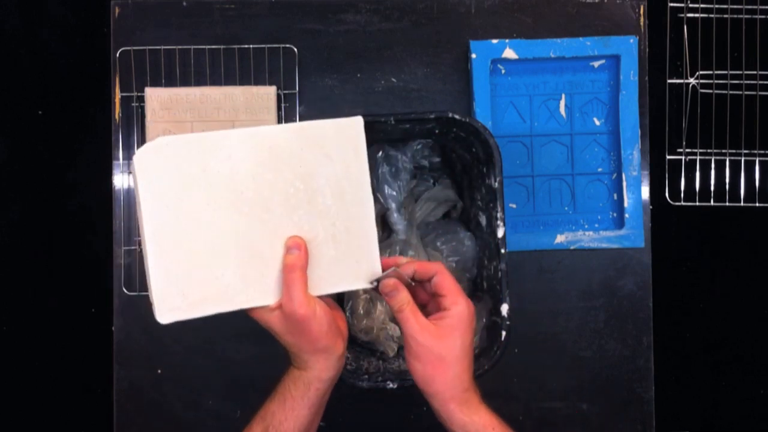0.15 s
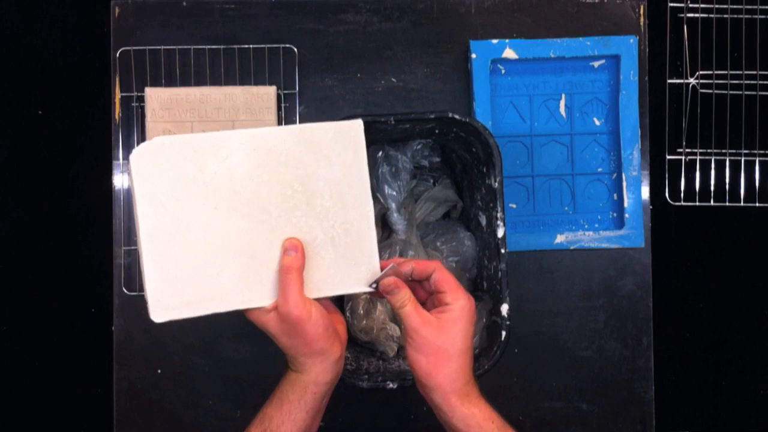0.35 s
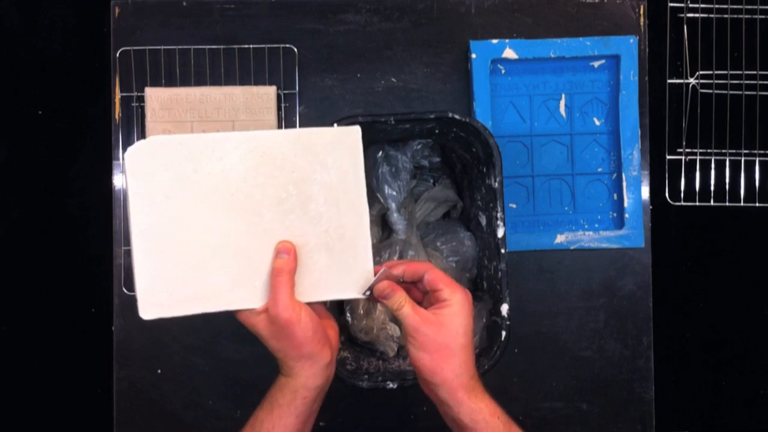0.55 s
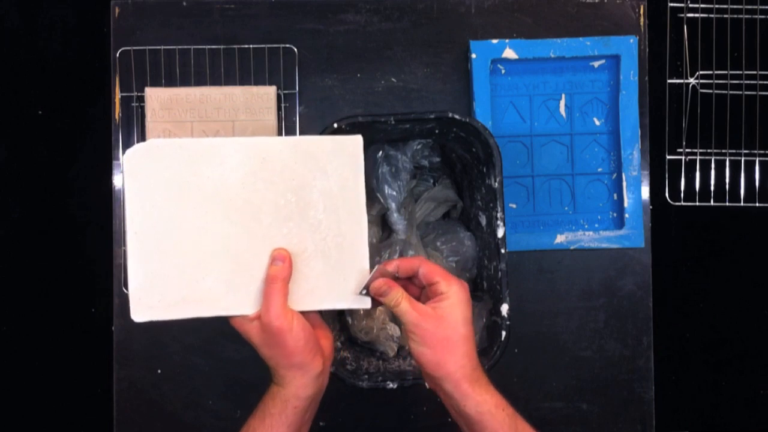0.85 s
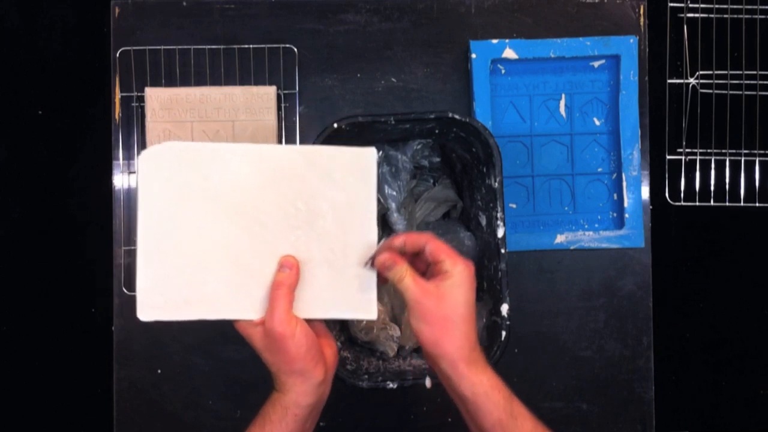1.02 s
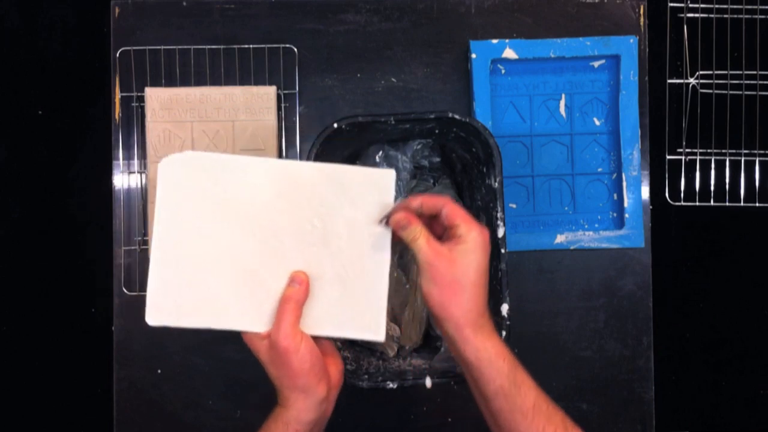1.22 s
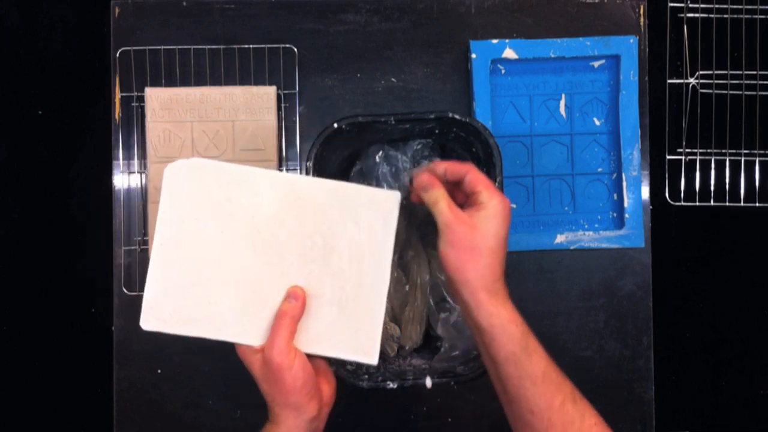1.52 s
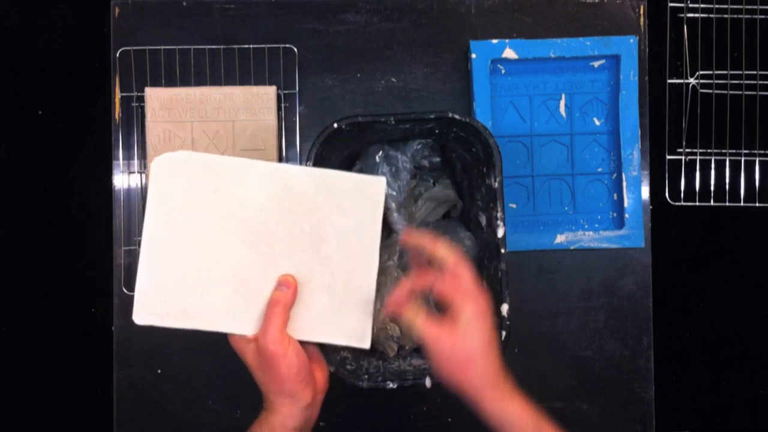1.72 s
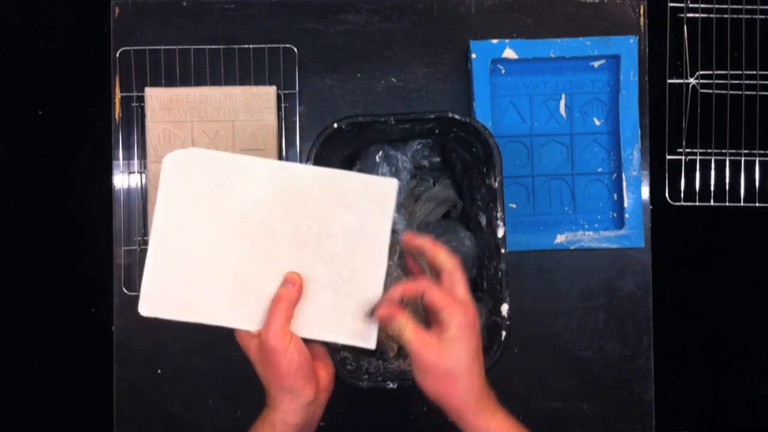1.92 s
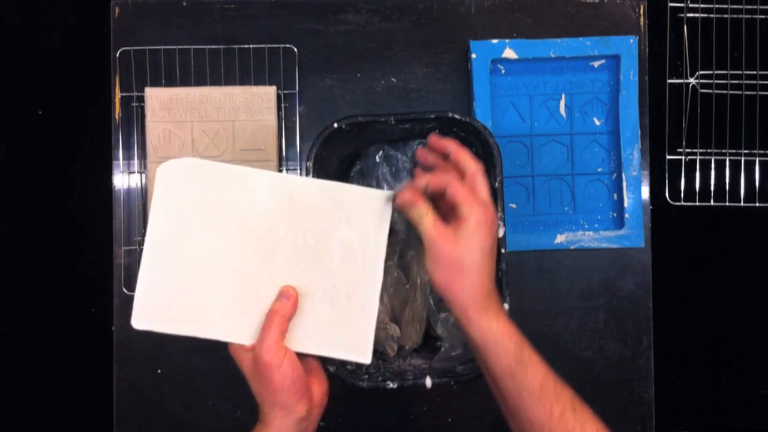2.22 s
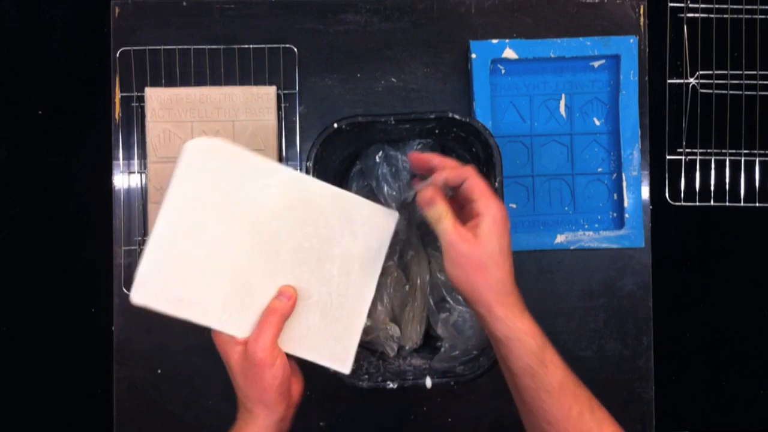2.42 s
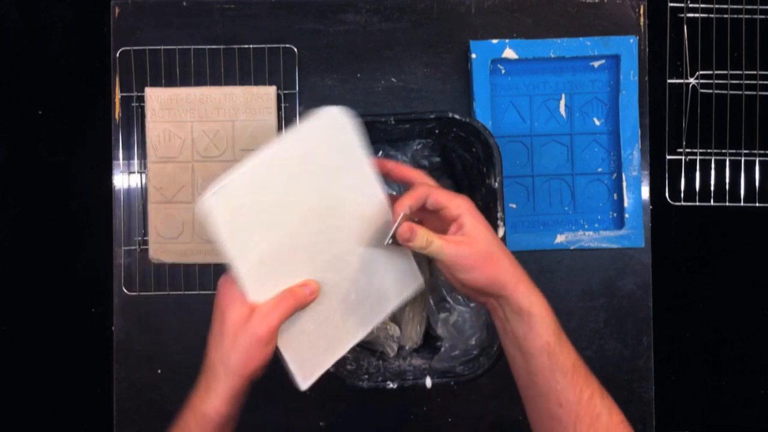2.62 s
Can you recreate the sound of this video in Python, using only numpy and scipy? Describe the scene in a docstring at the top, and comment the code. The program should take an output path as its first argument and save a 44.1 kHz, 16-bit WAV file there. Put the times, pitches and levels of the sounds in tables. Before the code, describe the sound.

Gritty scraping of thin metal along a hard plaster slab's edge, with knocks and ticks, in a quiet room

```python
"""First a soft hiss and low rumble of a quiet workshop, then light touches on a hand-held plaster slab.
A small aluminium blade scrapes its edge: a few light strokes, then two long ones. Random crumbling grains
hiss and set slab and blade ringing, which are banks of resonances. Noise bursts make the knocks, as the
blade lands or slips off the corner, and the ticks of crumbs. Filtered noise makes rubbing, hum and rumble.
The work and the room are on the left; the right holds only hiss and a faint trace of the left."""
import sys
import numpy as np
from scipy import signal
from scipy.fft import rfft, irfft
from scipy.io import wavfile

SR = 44100
rng = np.random.default_rng(int(sys.argv[2]) if len(sys.argv) > 2 else 0)


def store_wav(level_fs):
    """Save 16-bit WAV to argv[1]."""
    pcm = np.round(np.clip(np.atleast_2d(level_fs), -1, 1) * 32767)
    wavfile.write(sys.argv[1], SR, pcm.T.astype(np.int16))


N = 121275
TIME = np.arange(N) / SR

# How hard each stroke presses and bites; the overall levels below are added to these.
# Columns: t/s, slab ring level/dB, blade ring level/dB, grit hiss level/dB
FIRST_BRUSH = [(0.058, -89, -80, -85), (0.064, -57, -66, -82), (0.10, -72, -82, -86),
               (0.13, -53.5, -64, -80), (0.155, -90, -80, -85)]
SHORT_STROKE = [(0.82, -68, -82, -85), (0.85, -64, -78, -84), (0.884, -57.5, -77, -76),
                (0.896, -32, -53, -43), (0.916, -42, -74, -59), (0.928, -38.5, -60, -49.5),
                (0.948, -52, -73, -74), (0.968, -55, -79, -80), (0.995, -70, -83, -82)]
SECOND_BRUSH = [(1.055, -69, -80, -85), (1.065, -61, -79, -83), (1.09, -61.5, -82, -82),
                (1.112, -63, -78, -84)]
FIRST_PASS = [(1.112, -61, -77, -70), (1.132, -36, -48.5, -46.5), (1.16, -40, -49, -45),
              (1.24, -37, -48, -48), (1.244, -41.5, -58, -53), (1.288, -33, -44.5, -42),
              (1.362, -39, -52.5, -52.5), (1.402, -31, -33, -41), (1.446, -34, -48.5, -44.5),
              (1.502, -42, -44, -48.5), (1.598, -40.5, -43.5, -47), (1.626, -31.5, -35, -41.5),
              (1.652, -35.5, -47, -49.5), (1.67, -31, -42, -39), (1.7, -50, -71, -73)]
SECOND_PASS = [(2.078, -53, -76, -58), (2.096, -40, -39.5, -45.5), (2.16, -37, -42.5, -45),
               (2.182, -37, -38.5, -38), (2.204, -41, -48, -43), (2.23, -33, -45, -38.5),
               (2.326, -33, -58, -36.5), (2.348, -34.5, -51, -40.5), (2.424, -34, -46, -40),
               (2.474, -34, -42, -42), (2.48, -25.5, -35, -40.5), (2.492, -31.5, -39, -40),
               (2.51, -48, -85, -79)]
# The strokes in order. Columns: stroke table, start place on the edge (0-1), end place (0-1),
# coarse grating level/dB, crunch level/dB against the hiss, blade f/Hz, blade resonance width f/Hz
STROKES = [(FIRST_BRUSH, 0, 0, -24, 2, 6900, 570), (SHORT_STROKE, 0.012, 0.23, -7, -12, 6300, 1000),
           (SECOND_BRUSH, 0.017, 0.027, -10, -8, 7000, 1000), (FIRST_PASS, 0.036, 1, -3.6, -15, 7330, 690),
           (SECOND_PASS, 0.25, 0.98, -2.9, -14, 7140, 1340)]
RING_DB, BLADE_DB, HISS_DB = 3.5, 5.5, 8   # overall levels
SPEED_UP = 1.09   # the hand gathers speed: distance grows with this power of time

GRAINS_PER_S, GRAIN_SPREAD_DB = 14000, 1.5
CHATTER_PER_S, CHATTER_DB = 124, 2   # the edge catches and slips
CHIPS_PER_S, CHIP_SIZE, CHIP_S = 80, 0.8, 0.0005   # larger crumbs: rate, average jump in bite, fade time
CRUNCH_HZ, CRUNCH_WIDTH_HZ = 5530, 1500

# Ways the slab can ring (modes); their levels count only against each other.
# Columns: f/Hz, width f/Hz, mid-edge level/dB, extra near-corner level/dB, extra far-corner level/dB
SLAB_MODES = [(699.6, 4.24, -13, 11.5, 6.5), (796, 27.5, -14.5, -18, -3.5), (1469, 29.8, -9, 14.5, 14),
              (1592, 37, -18.5, 5, 15), (1955.5, 22.6, 2, -4.5, -7), (2213, 58, -5, 4, 6),
              (2318, 210, -16, 5.5, -16), (2967, 40, -14, 9, 4), (3205, 54, -8.5, -32, 6.5),
              (3260, 90, -16.5, -8, 1), (3714, 59, -15.5, 12.5, 16.5), (4007, 95, -22, 19.5, 11.5),
              (4410, 30, -16, 21.5, 20), (4704, 43, -18.5, -15, 14)]
CORNER_SHARPNESS = 7.4   # how fast a corner's colour fades along the edge
MODE_WANDER_PER_S, MODE_WANDER_DB = 2.1, 2.5   # each mode waxes and wanes as the contact travels

# The blade lands or slips off the corner; clack and ring levels scale the bursts before filtering.
# Columns: t/s, clack level/dB, crumbling fade t/s, ring level/dB, place on the edge (0-1)
KNOCKS = [(0.409, -33, 0.0073, -39.5, 0), (0.895, -58, 0.002, -20, 0.5), (1.669, -37, 0.0083, -31, 0.76),
          (2.047, -38.5, 0.012, -50, 0.1), (2.0551, -17, .002, -10.5, 0.11), (2.058, -11, 0.0022, -15, 0.7),
          (2.477, -36, 0.0019, -40, 0.8), (2.488, -46, 0.0035, -22, 0.7)]
KNOCK_SNAP = 0.88   # first contact, against the crumbling after it
KNOCK_SOFT_HZ = 2150   # a knock rings mostly the modes below this

# Hand and tool rub dully on the slab. Columns: start t/s, end t/s, level/dB
RUBS = [(0.034, 0.14, -59), (0.87, 0.98, -53.5), (1.107, 1.64, -45.5), (1.638, 1.828, -57),
        (2.065, 2.596, -49)]
RUB_FADE_S = 0.022
# Crumbs and light touches. Columns: t/s, level/dB of the touch, f/Hz, width f/Hz
TICKS = [(0.062, -45, 2500, 4440), (0.249, -46, 1640, 1500), (0.262, -41, 8800, 4000),
         (0.411, -37.5, 5900, 3000), (0.426, -44, 8000, 5000), (1.776, -40, 7160, 2000),
         (1.8001, -38.5, 1670, 2200), (1.835, -42.5, 1380, 1200), (1.891, -41, 2050, 780),
         (1.955, -42, 4900, 2000), (2.039, -42, 7550, 4000), (2.611, -39.5, 11500, 7000),
         (2.663, -43, 1870, 1200), (2.731, -41.5, 2450, 5070)]
TICK_S, TICK_SNAP = 0.0014, 2.5   # fade time of the crumble, size of the snap against it

# Tone of each sound: only the shape counts, as the filter evens out the total power.
# Columns: f/Hz, level/dB (per Hz)
GRATING_TONE = [(500, -26), (1050, -22.5), (1450, -7.5), (1750, -1), (2300, -1), (2750, -2), (3150, 7),
                (3500, -15.5), (4300, -4.5), (5200, -15), (9000, -11.5)]
GRIT_TONE = [(1500, -25), (4000, -27), (5000, -24), (5900, -3), (7000, 11.5), (8700, 8), (10200, 1.5),
             (11300, 9.5), (12500, 10.5), (14000, 7), (15800, 4)]
KNOCK_TONE = [(50, -50), (150, -39), (400, -25), (750, -4), (1020, -22), (1430, 5), (1700, -12),
              (2050, 3.5), (2500, -4), (3200, -8), (4100, -13), (5500, -30), (7000, -23), (8500, -31),
              (15000, -38)]
RUBBING_TONE = [(50, -17), (120, -2), (300, 0), (750, 2), (1100, -13.5), (2500, 0.5), (8000, -32.5)]
RUMBLE_TONE = [(20, -24), (45, -11), (70, -14.5), (92, 2), (125, -8), (165, -5), (260, -4), (500, -8),
               (1000, -12.5), (2000, -18.5), (6000, -38), (16000, -32)]
# Tone of the reflections, again only its shape. Columns: f/Hz, level/dB
ROOM_TONE = [(100, -0.5), (1000, 5.5), (4500, -0.5), (7000, 0), (15000, -1)]

ROOM_T60_S, ROOM_DB = 0.32, -16   # T60: time to fade by 60 dB
BENCH_T60_S, BENCH_DB = 0.093, -13.5   # close reflections off the bench and tub
REFLECTION_DELAY_S = 0.0088
# A low hum in the room swells and fades. Columns: t/s, level/dB
HUM_LEVEL = [(0, -66), (1.0, -84), (1.8, -64), (2.15, -66), (2.35, -61), (2.62, -59), (2.75, -78)]
HUM_HZ, HUM_WIDTH_HZ = 114.5, 12.3
RUMBLE_DB, LEFT_HISS_DB, RIGHT_HISS_DB = -58.5, -56, -59
RIGHT_LEAK_DB = -73
CUTOFF_HZ = 15800


def scraping():
    """Grains drive the slab, the blade and the hiss through each stroke, all chattering together."""
    chatter = chattering()
    grating = colour(grains(chatter), GRATING_TONE)
    hiss = colour(grains(chatter), GRIT_TONE)
    crunch = narrow(grains(chatter), CRUNCH_HZ, CRUNCH_WIDTH_HZ)
    blade_grains = grains(chatter)
    out, force, place = 0, 0, 0
    for curve, start, end, grate_db, crunch_db, blade_hz, blade_width in STROKES:
        s, *levels = np.transpose(curve)
        touching = (TIME >= s[0]) & (TIME < s[-1])
        push, bite, dust = [touching * from_db(np.interp(TIME, s, db)) for db in levels]
        travelled = np.interp(TIME, [s[0], s[-1]], [0, 1]) ** SPEED_UP
        place = np.where(touching, start + (end - start) * travelled, place)
        force = force + push
        blade = narrow(blade_grains, blade_hz, blade_width)
        grit = hiss + from_db(crunch_db) * crunch
        out = out + from_db(BLADE_DB) * bite * blade
        out = out + from_db(HISS_DB) * dust * grit
        out = out + from_db(grate_db) * push * grating
    return out + from_db(RING_DB) * slab(force * grains(chatter), place)


def chattering():
    """Uneven bite of the edge, with a brief jump each time a chip breaks away."""
    chips = (rng.random(N) < CHIPS_PER_S / SR) * np.minimum(rng.exponential(1, N), 2)
    fade = np.exp(-1 / (CHIP_S * SR))
    jumps = signal.lfilter([1], [1, -fade], chips + 1e-18)
    return from_db(CHATTER_DB * drift(CHATTER_PER_S)) * (1 + CHIP_SIZE * jumps)


def grains(chatter):
    """Dense fractures at random moments, uneven in size, whose strength follows the edge's chatter."""
    sizes = from_db(GRAIN_SPREAD_DB * np.minimum(rng.exponential(1, N), 5))
    signs = rng.choice([-1, 1], N)
    breaking = rng.random(N) < GRAINS_PER_S / SR
    return rms_one(sizes * signs * breaking * chatter)


def slab(force, place):
    """The slab's modes under a force; where the edge is touched decides which of them speak."""
    place = np.clip(place, 0, 1)
    near, far = (1 - place) ** CORNER_SHARPNESS, place ** CORNER_SHARPNESS
    gains = [from_db(db + near_db * near + far_db * far) for _, _, db, near_db, far_db in SLAB_MODES]
    # even out the total ringing power along the edge
    power = sum(gain ** 2 * np.pi * mode[1] / SR for gain, mode in zip(gains, SLAB_MODES))
    force = force / np.sqrt(power)
    out = 0
    for k, (gain, (hz, width, *_)) in enumerate(zip(gains, SLAB_MODES)):
        wander = from_db(MODE_WANDER_DB * drift(MODE_WANDER_PER_S))
        # neighbouring modes take opposite signs
        out = out + resonate(force * gain * wander, hz, width) * (-1) ** k
    return out


def knocks():
    """A snap and a few milliseconds of crumbling: a dull clack that leaves the slab ringing."""
    clack, force, places = 0, 0, 0
    for s, db, crumble_s, ring_db, place in KNOCKS:
        blow = burst(s, crumble_s)
        blow[int(s * SR)] += KNOCK_SNAP
        clack = clack + from_db(db) * blow
        force = force + from_db(ring_db) * burst(s, crumble_s)
        places = np.where(TIME >= s, place, places)
    soften = signal.butter(2, KNOCK_SOFT_HZ, fs=SR, output="sos")
    force = signal.sosfilt(soften, force)
    return colour(clack, KNOCK_TONE) + slab(force, places)


def rubbing():
    """A dull, even rub while hand and tool slide: filtered noise that fades in and out."""
    level = 0
    for start, end, db in RUBS:
        fade = np.clip(np.minimum(TIME - start, end - TIME) / RUB_FADE_S, 0, 1)
        level = level + from_db(db) * fade
    return level * colour(rng.standard_normal(N), RUBBING_TONE)


def ticks():
    """Tiny contacts, each a snap and a short crumble in one broad resonance."""
    out = 0
    for s, db, hz, width in TICKS:
        touch = burst(s, TICK_S)
        touch[int(s * SR)] += TICK_SNAP
        width_gain = np.sqrt(SR / np.pi / width)   # makes up for what a narrow resonance loses
        out = out + from_db(db) * width_gain * resonate(touch, hz, width)
    return out


def reflections(x, t60):
    """Diffuse reflections that die away, at the power of the source."""
    tail = rng.standard_normal(N) * from_db(-60 * TIME / t60) * (TIME > REFLECTION_DELAY_S)
    return signal.fftconvolve(x, tail / np.linalg.norm(tail))[:N]


def hum():
    """A narrow, wavering drone: noise through a narrow resonance."""
    level = from_db(np.interp(TIME, *np.transpose(HUM_LEVEL)))
    return level * narrow(rng.standard_normal(N), HUM_HZ, HUM_WIDTH_HZ)


def rumble():
    """The room's steady rumble: noise that is strongest in the low range."""
    return from_db(RUMBLE_DB) * colour(rng.standard_normal(N), RUMBLE_TONE)


def background_hiss():
    """Steady white noise, separate in each channel."""
    return from_db([[LEFT_HISS_DB], [RIGHT_HISS_DB]]) * rng.standard_normal((2, N))


def from_db(db):
    """Decibels to gain."""
    return 10 ** (np.asarray(db) / 20)


def rms_one(x):
    """Scale to an average strength (rms) of one."""
    return x / np.sqrt(np.mean(x ** 2) + 1e-20)


def drift(rate):
    """Smooth random wandering, faster for a higher rate, with a spread of one."""
    r = np.exp(-40 * np.pi * rate / SR)   # made at a 20th of the sample rate
    noise = rng.standard_normal(N // 20 + 2002)
    slow = signal.lfilter([1], [1, -2 * r, r * r], noise)[2000:]   # drop the settling-in
    return np.interp(np.arange(N) / 20, np.arange(len(slow)), rms_one(slow))


def burst(s, decay_s):
    """Noise that starts at once and dies away."""
    return rng.standard_normal(N) * (TIME >= s) * np.exp(-np.abs(TIME - s) / decay_s)


def resonate(x, hz, width_hz):
    """One resonance with a gain of one on top; a narrower one rings longer."""
    r = np.exp(-np.pi * width_hz / SR)
    top = np.array([1, 0, -1]) * (1 - r * r) / 2
    bottom = [1, -(1 + r * r) * np.cos(2 * np.pi * hz / SR), r * r]
    return signal.lfilter(top, bottom, x + 1e-18)


def narrow(x, hz, width_hz):
    """Two equal resonances in a row give steep skirts; rms one."""
    each_width = np.sqrt(2) * width_hz
    return rms_one(resonate(resonate(x, hz, each_width), hz, each_width))


def colour(x, spectrum, size=4096):
    """Filter that never sounds ahead of its input, with the given tone; white noise keeps its power."""
    hz, db = np.transpose(spectrum)
    bins_hz = np.arange(size // 2 + 1) * SR / size
    gain = from_db(np.interp(np.log(bins_hz + 1), np.log(hz), db))
    # the folded cepstrum packs the response's energy at its start (minimum phase)
    cepstrum = irfft(np.log(gain))[:size // 2]
    response = irfft(np.exp(2 * rfft(cepstrum, size)))
    return signal.fftconvolve(x, response / np.linalg.norm(response))[:N]


def scene():
    """Tool and room on the left; the right holds only hiss and a trace of the left."""
    work = scraping() + knocks() + rubbing() + ticks()
    far = from_db(ROOM_DB) * reflections(work, ROOM_T60_S)
    close = from_db(BENCH_DB) * reflections(work, BENCH_T60_S)
    room = colour(far + close, ROOM_TONE)
    left = work + room + hum() + rumble()
    return np.array([left, from_db(RIGHT_LEAK_DB) * left]) + background_hiss()


def record(dry):
    """A steep filter cuts the top of the treble."""
    cut = signal.ellip(12, 0.1, 70, CUTOFF_HZ, fs=SR, output="sos")   # 0.1 dB ripple, 70 dB cut
    return signal.sosfilt(cut, dry)


dry = scene()
out = record(dry)
store_wav(out)
```